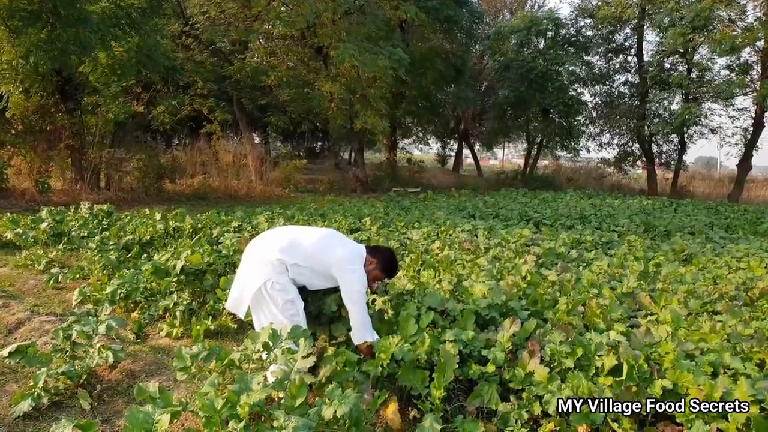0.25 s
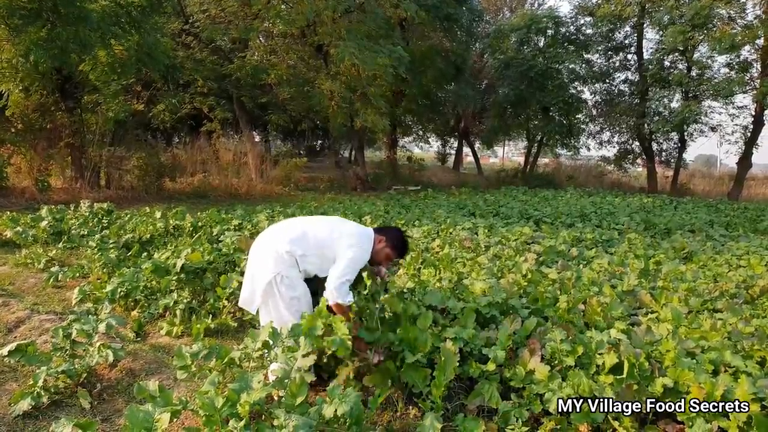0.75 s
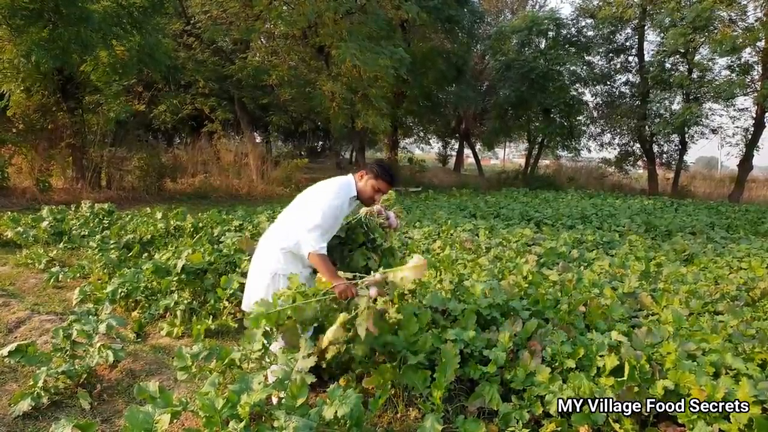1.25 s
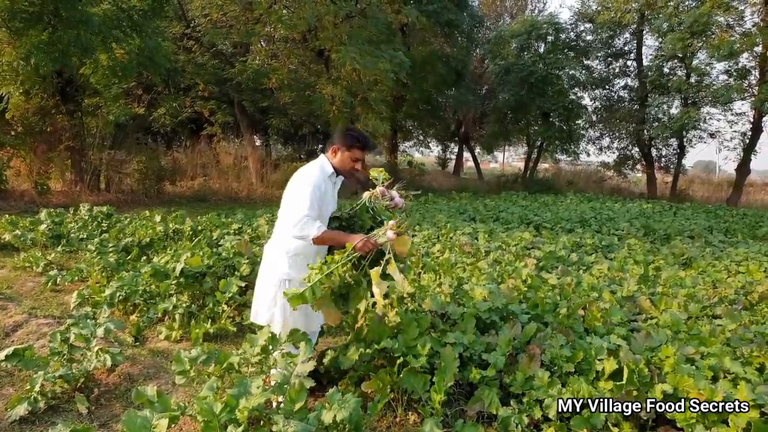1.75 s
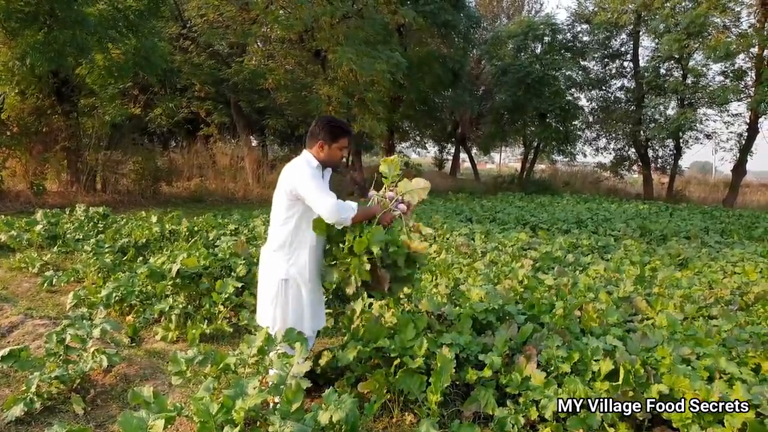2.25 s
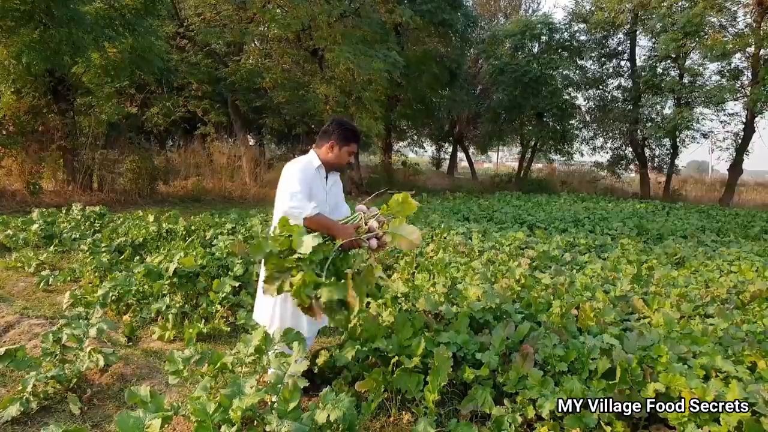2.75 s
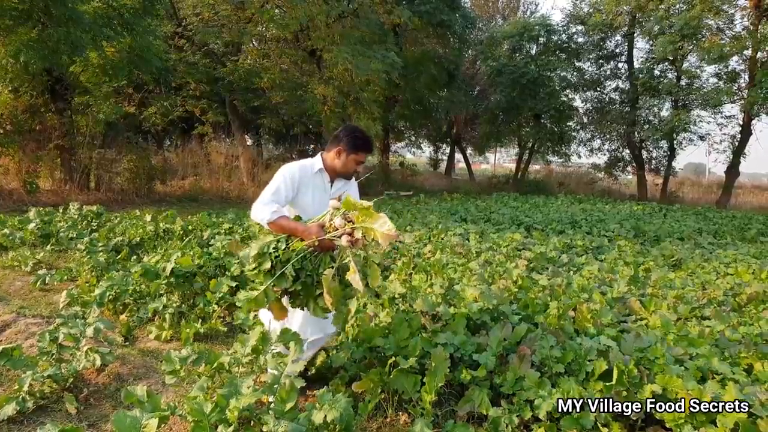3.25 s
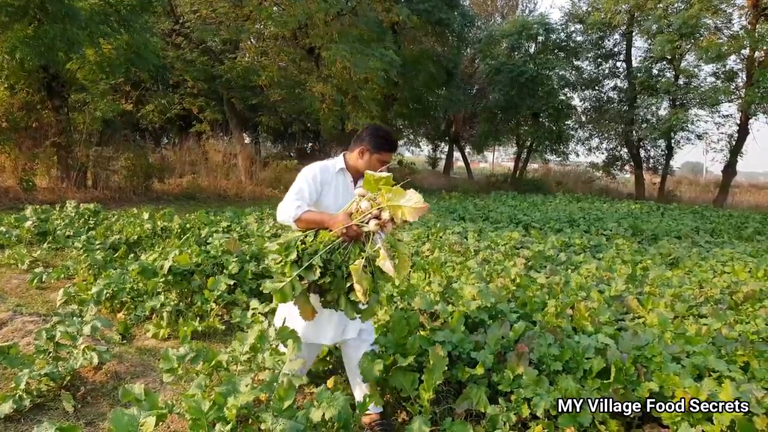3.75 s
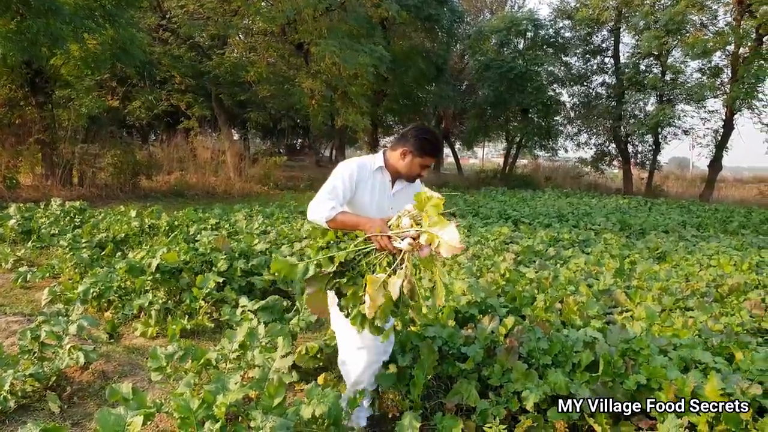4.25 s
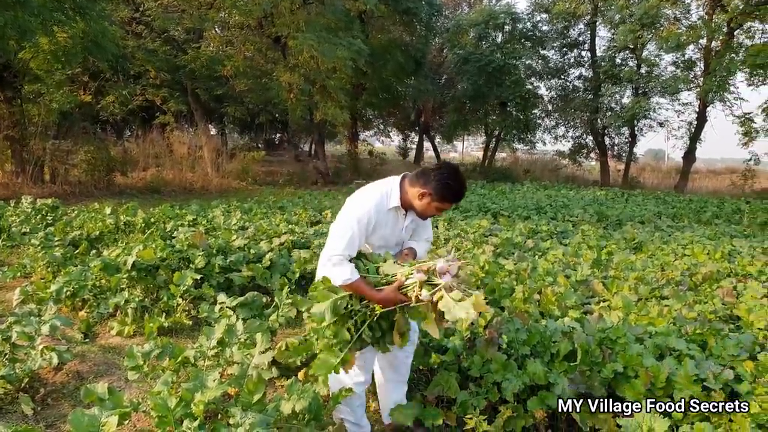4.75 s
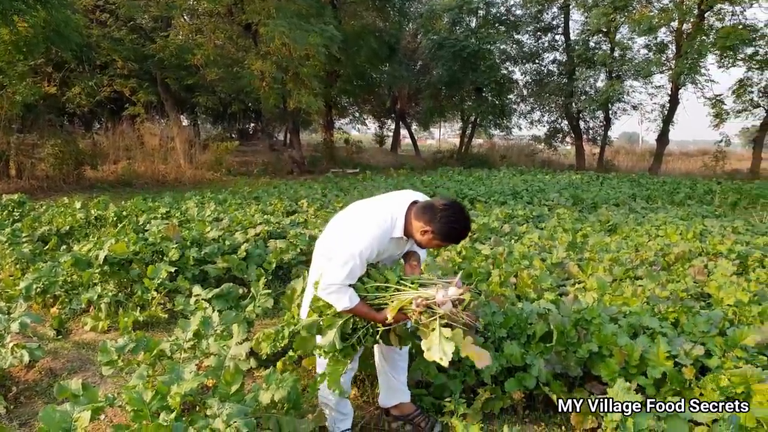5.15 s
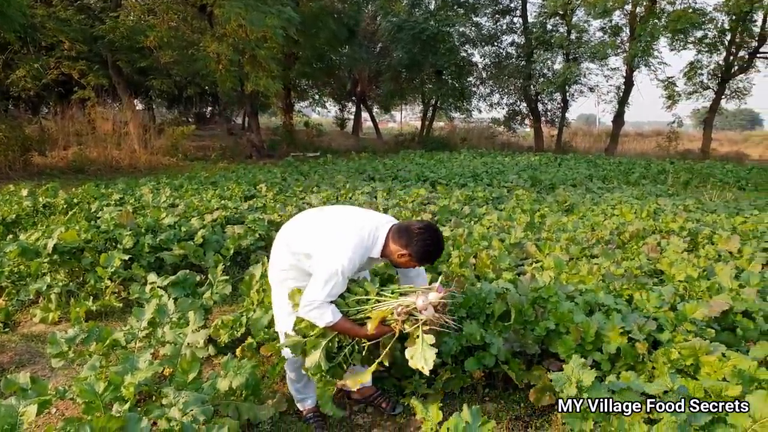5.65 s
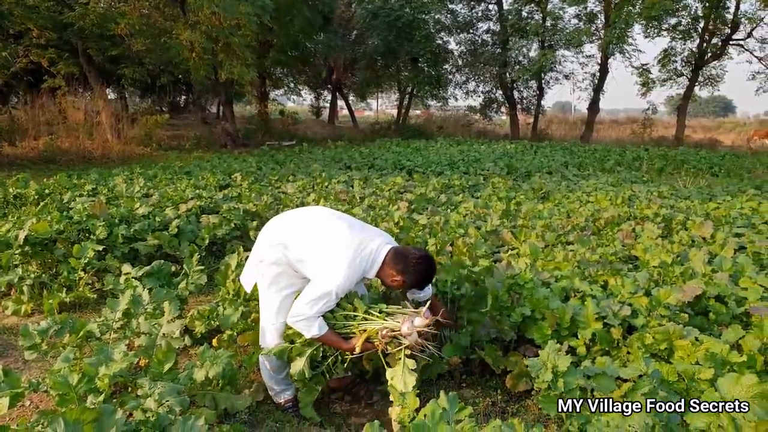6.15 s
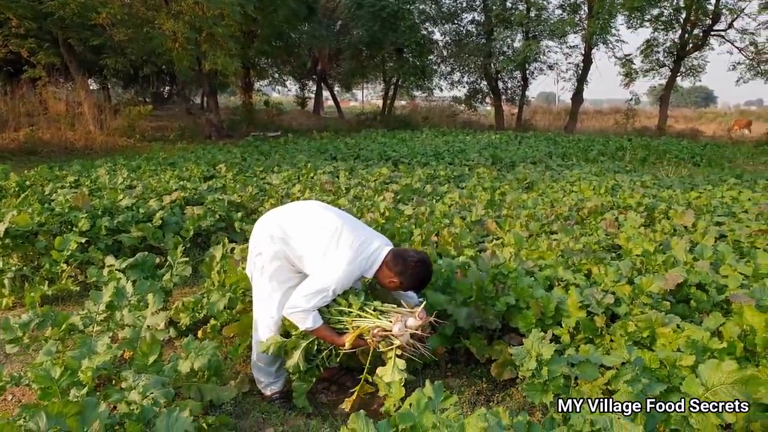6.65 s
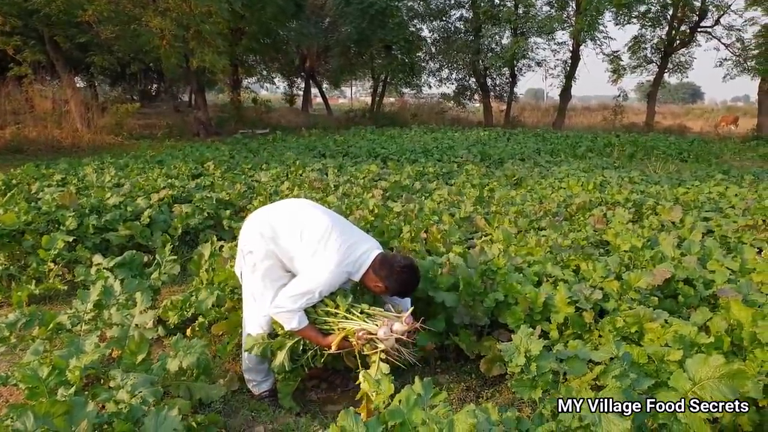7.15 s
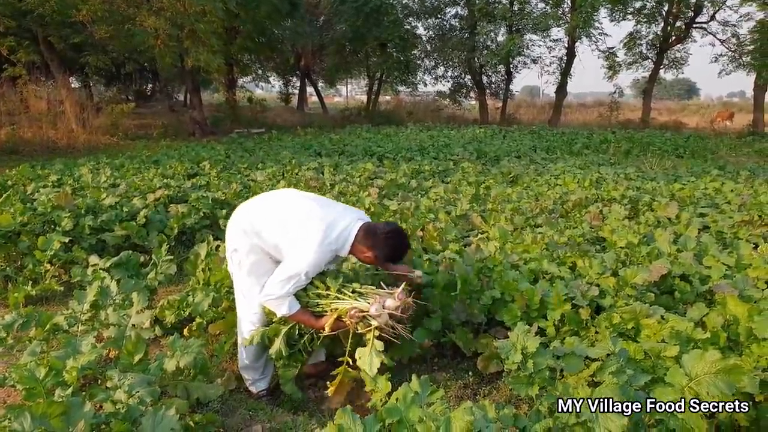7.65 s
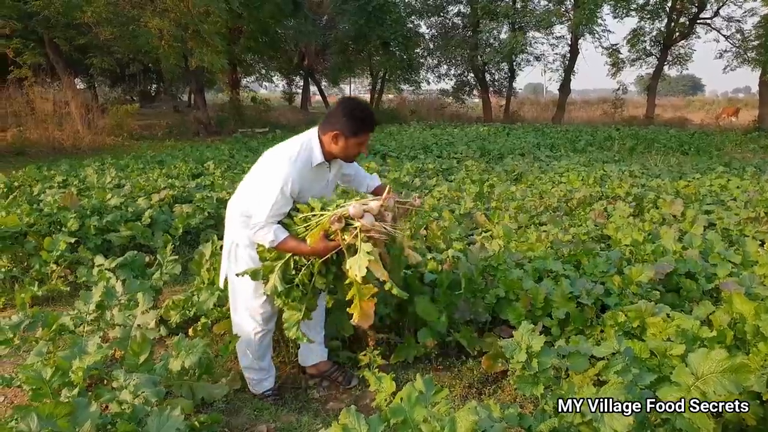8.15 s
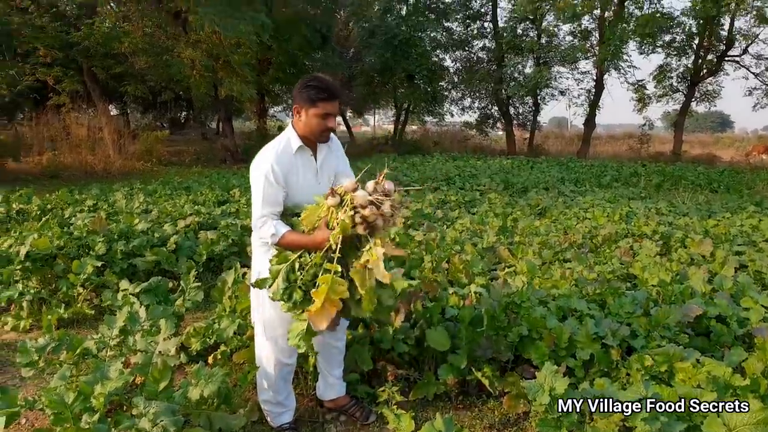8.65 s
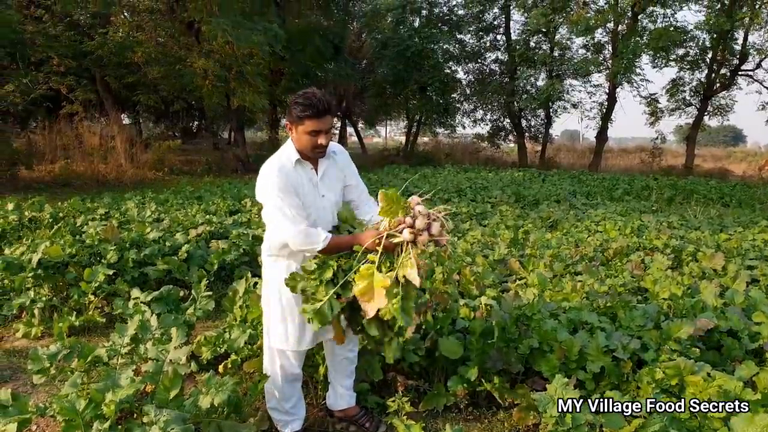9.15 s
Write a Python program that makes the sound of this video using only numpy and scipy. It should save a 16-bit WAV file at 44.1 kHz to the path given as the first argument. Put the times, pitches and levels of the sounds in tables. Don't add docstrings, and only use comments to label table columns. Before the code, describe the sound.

Leafy root plants are pulled and bundled with rustling, snapping stalks and dull root knocks, over a distant tractor, pump drone and one bird phrase.

```python
import sys
import numpy as np
from scipy import signal
from scipy.fft import rfft, irfft, next_fast_len
from scipy.io import wavfile
from scipy.ndimage import uniform_filter1d

SR = 44100
rng = np.random.default_rng(int(sys.argv[2]) if len(sys.argv) > 2 else 0)


def pcm_store(signal):
    levels = np.round(np.clip(np.atleast_2d(signal), -1, 1) * 32767)
    wavfile.write(sys.argv[1], SR, levels.astype(np.int16).T)


def volts(x):
    e = np.asarray(x, float) / 20
    return 10 ** e


N = 414981
T = np.arange(N) / SR

# [f/Hz, level/dB per Hz]
FIELD_COLOUR = [(12, -46), (20, -9), (65, -8), (139, -9.5), (156, -9.5), (179, -26.5), (230, -26.5),
                (465, -37.5), (583, -39.5), (1470, -29.5), (3330, -38.5), (5070, -28), (8170, -47),
                (15000, -47), (16500, -56)]
# [f/Hz, likeness 0-1]
FIELD_LIKENESS = [(60, 1), (150, 0.88), (380, 0.78), (950, 0.0072), (2380, 0.031), (5980, 0.053),
                  (15000, 0.044)]
# [f/Hz, level/dB]
MIC_TILT = [(60, 0.5), (120, 1.5), (240, -1), (480, 1), (950, 1), (1890, -1), (3770, -4), (7520, -0.5),
            (15000, 7)]

# [t/s, level/dB]
PUMP_LEVEL = [(0.0, -37), (0.018, -35), (0.71, -41), (1.13, -36), (1.36, -41), (2.8, -41.5), (3.77, -49),
              (3.9, -43), (4.43, -59), (4.48, -45), (5.16, -43.5), (6.32, -51), (6.65, -42), (7.0, -49),
              (9.3, -43), (9.41, -49.5)]
# [multiple of the pump pitch, level/dB]
PUMP_PARTIALS = [(1.2, -17), (.8, -14.5)]

# [t/s, level/dB]
TRACTOR_LOAD = [(0, -42.5), (.7, -40.5), (1.35, -40.5), (2.07, -45.5), (2.46, -60), (2.62, -46),
                (2.92, -45), (3.45, -44), (3.7, -71), (4, -51), (4.27, -49.5), (5.05, -47), (5.9, -57.5),
                (7.0, -52.5), (7.45, -78), (7.92, -69), (8.3, -101), (9.41, -91)]
# [t/s, firings per s]
FIRING_RATE = [(0, 45.1), (.6, 44.6), (1, 43.4), (2.07, 43.6), (2.5, 37.6), (2.62, 38.5), (3.5, 37.7),
               (4, 35.1), (4.27, 34.9), (5.05, 39.3), (5.3, 41.9), (5.9, 47), (7.07, 45), (7.7, 39),
               (9.41, 39)]
# [f/Hz, width/Hz, level/dB]
ENGINE_BLOCK = [(72, 30, 4), (330, 250, -11), (820, 200, -17), (1670, 180, -12), (2190, 170, 0),
                (2400, 170, -9), (2620, 170, -5)]
CYLINDER_LEVELS = [0, -4, -1.5]
# [t/s, peak level/dB]
HARD_FIRINGS = [(0.092, -30), (0.115, -36), (0.2239, -36), (0.2476, -32), (0.2693, -30), (0.3358, -28.5),
                (0.379, -27), (0.4702, -28), (0.515, -27), (0.6025, -30), (0.6699, -29), (0.7831, -28.5),
                (0.8054, -32), (0.9203, -31.5), (1.0134, -26), (1.0575, -30), (1.0824, -29), (1.1744, -31),
                (1.2426, -31), (1.265, -29), (1.3114, -33), (1.3352, -26.5), (1.3585, -32), (1.4025, -29),
                (1.474, -30.5), (1.5423, -31), (1.6332, -31), (1.6814, -29.5), (1.704, -29.5),
                (1.7725, -29.5), (1.8186, -32.5), (1.9106, -30), (1.957, -31.5), (1.9794, -30),
                (2.026, -31), (2.094, -32), (2.6922, -33), (2.7172, -32), (2.8504, -33), (2.877, -29.5),
                (2.928, -31.5), (3.035, -34), (3.166, -35.5), (3.2725, -33.5), (3.327, -32), (3.352, -33),
                (3.4042, -35), (3.4315, -30.5), (3.483, -36), (3.59, -35.5), (3.9225, -41), (3.952, -39),
                (3.979, -37), (4.008, -40), (4.0362, -35.5), (4.1804, -36), (4.323, -35), (4.4942, -33),
                (4.5755, -31), (5.05, -32)]
# [t/s, f/Hz, level/dB]
GEAR_WHINE = [
    (2.5, 772, -80),
    (2.56, 850, -69),
    (2.9, 1095, -70),
    (3.0, 1105, -63),
    (3.4, 1110, -64),
    (3.5, 1112, -72),
    (3.68, 1118, -67),
    (3.85, 1120, -72),
]

# [t/s, length/s, f/Hz, peak level/dB]
HELD_NOTES = [(4.831, 0.039, 3280, -35.5), (5.756, 0.041, 3560, -32), (5.791, 0.011, 3465, -22.5),
              (5.806, 0.013, 3310, -19), (5.834, 0.053, 2418, -26.5), (5.892, 0.0085, 2264, -24),
              (6.101, 0.023, 2896, -26), (6.129, 0.024, 2895, -24), (6.162, 0.024, 2870, -22.5),
              (6.176, 0.028, 2785, -24), (6.201, 0.014, 2830, -39), (6.277, 0.04, 3387, -23.5),
              (6.299, 0.032, 3345, -24), (6.359, 0.039, 2502, -22), (6.385, 0.04, 2430, -27),
              (6.693, 0.0063, 3260, -27), (6.709, 0.013, 2780, -27.5), (6.749, 0.019, 2126, -29.5),
              (6.764, .032, 2086, -33), (6.839, 0.023, 2050, -38), (6.725, 0.03, 5500, -47),
              (6.959, .01, 3900, -34), (6.92, 0.012, 3850, -20), (6.942, 0.0072, 3270, -25)]
# [t/s, length/s, start f/Hz, end f/Hz, peak level/dB]
WARBLE_NOTES = [(5.529, .018, 2840, 4250, -50), (5.559, 0.012, 4200, 4000, -35),
                (5.564, .011, 4050, 3280, -36), (5.573, .006, 3400, 4300, -38),
                (5.575, 0.0072, 2250, 2500, -37), (5.58, .006, 2800, 3700, -37),
                (5.584, 0.015, 2400, 2150, -37), (5.589, .015, 4700, 3200, -34),
                (5.600, 0.0069, 3400, 4400, -42), (5.602, 0.0075, 2100, 3220, -34),
                (5.609, .009, 3200, 2270, -34), (5.615, 0.0064, 2330, 2110, -29),
                (5.616, 0.012, 4600, 3270, -33), (5.621, 0.011, 3340, 3300, -34),
                (5.628, 0.0073, 2270, 3100, -38), (5.634, 0.0078, 3240, 2250, -31),
                (5.641, 0.012, 4440, 2650, -32.5), (5.642, .008, 2610, 2800, -43),
                (5.656, .008, 2920, 2500, -45), (5.661, 0.0158, 2800, 1830, -40),
                (6.643, .016, 3410, 3100, -41), (6.657, 0.011, 2770, 2750, -38),
                (6.656, .008, 4100, 4080, -37), (6.664, 0.017, 4080, 2270, -32.5),
                (6.677, .007, 3350, 3100, -32), (6.687, 0.0065, 4200, 3480, -33),
                (6.702, 0.013, 3260, 2130, -33), (6.703, .005, 4300, 3900, -36),
                (6.72, 0.0096, 2770, 2130, -33), (6.73, 0.0088, 2890, 2230, -29),
                (6.732, .015, 2300, 2160, -29), (6.734, 0.0062, 3070, 2800, -37),
                (6.881, 0.013, 3500, 3730, -30), (6.906, 0.0117, 6160, 4860, -20.5),
                (6.952, .009, 2780, 2130, -26)]
# [t/s, start f/Hz, peak level/dB]
SLUR_NOTES = [(5, 2410, -40), (5.822, 3030, -25), (6.092, 4320, -35), (6.328, 3410, -23),
              (6.345, 3030, -23.5), (6.686, 5700, -36), (6.711, 5750, -37), (6.656, 6150, -43),
              (6.668, 6300, -42), (6.862, 5900, -42), (6.930, 3740, -21)]
STROKE_NOTES = [
    (6.855, 3560, -32),
    (6.857, 2920, -33),
]
RISING_NOTES = [
    (6.066, 2300, -29),
    (6.076, 2490, -27),
]
FLICK_NOTES = [
    (5.800, 5430, -27),
    (5.818, 4700, -30),
    (6.327, 5050, -23.5),
    (6.344, 4400, -29),
]
# [start t/s, end t/s, period/s, start f/Hz, peak level/dB]
RUNS_OF_SLURS = [
    (6.087, 6.16, .0305, 2480, -32.5),
]
RUNS_OF_PIPS = [
    (6.969, 7.02, .0139, 2600, -29),
    (6.9755, 7.02, 0.013, 2465, -27),
    (7.022, 7.036, .0055, 2170, -32),
    (7.041, 7.05, 0.0052, 2040, -34),
    (5.903, 5.922, 0.0065, 2410, -33),
    (5.905, 5.94, .0066, 1910, -33),
    (6.428, 6.45, .006, 2460, -34),
    (6.437, 6.475, .0066, 1900, -33.5),
]

# [t/s, peak level/dB, f/Hz]
ROOT_KNOCKS = [(0.168, -35, 261), (0.222, -53, 320), (0.277, -42, 261), (0.367, -45, 269),
               (0.441, -47, 315), (0.561, -37, 294), (0.837, -48, 298), (0.904, -43, 275),
               (1.102, -51, 310), (1.243, -43, 269), (1.523, -52, 347), (1.916, -54, 299),
               (2.016, -53, 261), (3.944, -47, 331), (4.398, -48, 261), (4.782, -41, 285),
               (7.139, -53, 700), (7.199, -47, 261), (7.294, -54, 261), (7.397, -45, 345),
               (8.608, -48, 315), (8.656, -39, 323), (8.882, -44, 264), (9.338, -42, 646)]

# [f/Hz, level/dB per Hz]
LEAF_COLOUR = [(150, -71), (250, -7), (343, -2.5), (531, -20.5), (753, -2), (1230, -9), (1490, -3),
               (2120, -1), (2800, -6), (4340, -0.5), (6600, -5), (8140, -13), (14000, -10), (15700, -22),
               (16400, -50)]
LEAF_LIKENESS = (.6, .2, .03)
# [peak t/s, length/s, effort level/dB, fizz level/dB over swish]
HAND_MOVES = [(0.0, 0.38, -44.5, -5.5), (0.33, .2, -46.5, -6.5), (0.683, 0.53, -39, -6.5),
              (1.065, 0.43, -43, -6.5), (1.537, 0.1, -47, -9), (2.0, 1, -54, -10), (2.226, 0.29, -47, -5),
              (2.76, 0.43, -47.5, -6), (3.18, 0.26, -52, -7), (5.12, 0.2, -50, -13), (8.12, 0.18, -59, -26),
              (3.768, 0.15, -49.5, -3.5), (4.123, 0.21, -46.5, -3.5), (4.354, 0.18, -43, -6.5),
              (4.57, 0.21, -45.5, -6.5), (4.88, 0.31, -40.5, -7.5), (5.5, 0.33, -49, -11),
              (5.974, 0.33, -48.5, -8), (6.3, 0.8, -49.5, -8.5), (6.9, 0.044, -35.5, -4),
              (7.042, 0.22, -41, -6), (7.198, 0.16, -43, -3), (7.484, 0.28, -45, -3),
              (7.868, 0.36, -41.5, -6), (8.66, 0.19, -44, -3), (8.776, 0.056, -44.5, -4),
              (8.994, 0.29, -44.5, -6), (9.314, 0.54, -50, -3.5)]
# [peak t/s, length/s, body level/dB]
BUNDLE_SHIFTS = [
    (.05, 0.32, -49.5),
    (2.25, .2, -61),
    (4.85, 0.19, -46),
    (8.67, 0.067, -54.5),
    (9.1, 0.44, -59),
    (9.36, 0.13, -63),
]
# [t/s, swish peak level/dB, fizz level/dB over swish, body level/dB over swish]
STALK_SNAPS = [(0.1695, -15.5, -5.5, -13), (0.2994, -31, -4, -20), (0.366, -29, -21, -7),
               (0.5188, -29, -8, -1), (0.8324, -27, 7, -3), (1.4226, -29.5, -19, -20.5),
               (2.06, -38, -2, -11), (4.8012, -21.5, -7, -0.5), (4.8148, -27, -12, 1),
               (4.8314, -29, -18, 5), (4.9184, -35, -15, 2), (5.004, -24.5, -10, -6.5),
               (6.1215, -29, -7, -20), (6.8757, -18.5, -10, -10.5), (7.0074, -28.5, -7, -16),
               (7.0413, -32, -24, -20), (7.144, -28, -3, -3.5), (7.2, -21.5, -4, -9),
               (7.233, -31, -10, -25), (7.255, -28.5, -9, -18), (7.219, -28, -16, -29),
               (7.2937, -33.5, -21, 0), (7.3967, -22.5, -16, -7), (7.411, -27, -9, -12),
               (8.6228, -32, 3, -4), (8.673, -30, -2, -5), (8.8955, -36, -5, 1), (8.9501, -33, 2.5, -2),
               (8.9574, -33, 1, -11), (8.982, -29.5, 0, -4), (9.2718, -32, -4, -25),
               (9.3398, -25.5, 3.5, -15), (9.148, -38, -2, -20), (9.245, -44, 0, -20), (9.318, -41, 1, -20)]
LEAF_CRUNCHES = [(0.4539, -32, 2, 0), (0.562, -30, 2, -22), (0.9044, -31.5, -15, -16), (0.988, -25, 0, -9),
                 (1.0234, -46, 15, -9), (1.1144, -27.5, -5, -4), (1.2444, -35.5, 3, 1),
                 (1.5274, -37.5, -4, 2), (2.2194, -31.5, 0, 1.5), (3.7134, -44, -5, 2),
                 (4.3594, -35, 1, -13), (5.1841, -45, 6, -12), (7.0773, -26, -18, -26),
                 (7.5433, -33, 2, -27), (7.9972, -35, 1, -7)]
# [t/s, f/Hz, peak level/dB]
STALK_RINGS = [(0.108, 850, -40), (0.132, 850, -42), (0.149, 850, -40), (0.1697, 5220, -13),
               (0.1705, 6470, -12.5), (0.453, 820, -37), (0.518, 850, -34), (4.8013, 895, -21.5),
               (4.8019, 1400, -32), (4.8013, 2280, -20.5), (4.8006, 5740, -22), (4.815, 2100, -32),
               (4.815, 850, -34), (4.8315, 2230, -26), (4.8317, 860, -33), (4.832, 1330, -37),
               (5.004, 3480, -22), (5.004, 6800, -19), (6.8753, 4970, -23), (6.876, 2920, -24),
               (6.877, 1510, -28.5), (6.877, 920, -44), (6.901, 800, -44), (7.145, 810, -33),
               (7.1996, 3800, -20), (7.3966, 4530, -21), (7.3965, 1020, -39), (8.626, 955, -33),
               (8.626, 1510, -36), (8.659, 765, -37), (8.677, 790, -34.5), (8.675, 1520, -35),
               (8.896, 1570, -24.5), (8.896, 1210, -31), (8.896, 2280, -28.5), (8.896, 960, -34),
               (9.340, 5550, -18.5), (9.346, 4750, -21), (9.341, 794, -31.5)]


def evened(x):
    return x / np.sqrt(np.mean(x ** 2, axis=-1, keepdims=True) + 1e-20)


def read(points, hz):
    f, value = np.transpose(points)
    return np.interp(np.log(hz + 1), np.log(f + 1), value)


def follow(rows):
    s, *columns = np.transpose(rows)
    return [np.interp(T, s, c) for c in columns]


def drift(hz):
    step = 64
    coarse = signal.lfilter(*signal.butter(2, hz * step * 2 / SR), rng.standard_normal(N // step + 2))
    return np.interp(np.arange(N) / step, np.arange(len(coarse)), evened(coarse))


def wave(turns):
    return np.sin(2 * np.pi * turns)


def resonate(x, hz, width):
    return signal.lfilter(*signal.iirpeak(hz, hz / width, SR), x)


def placed(x, lead, pan_db):
    return np.array([x * volts(pan_db / 2), np.roll(x, lead) * volts(-pan_db / 2)])


def paired(noise, same):
    same = np.clip(same, 0, 1)
    return np.sqrt(1 - same) * noise[:2] + np.sqrt(same) * noise[2]


def field():
    frames, hz = N // 512 + 5, np.fft.rfftfreq(2048, 1 / SR)
    a, b, c, d, patches = rng.standard_normal((frames, 1025, 5)).T
    patches = uniform_filter1d(patches, size=20, axis=0)
    patches = evened(uniform_filter1d(patches, size=8, axis=1))
    same = np.clip(read(FIELD_LIKENESS, hz), -1, 1)[:, None]
    left = a + 1j * b
    right = same * left + np.sqrt(1 - same ** 2) * (c + 1j * d)
    spectra = np.array([left, right]) * volts(read(FIELD_COLOUR, hz)[:, None] + 2 * patches)
    sound = signal.istft(spectra, nperseg=2048, noverlap=1536)[1][:, :N]
    return volts(-44) * sound / np.std(sound)


def insects():
    hz, width, level_db = 6280, 730, -55.5
    hiss = rng.standard_normal((2, N))
    hiss = resonate(resonate(hiss, hz, width), hz, width)
    return volts(level_db + drift(1.5)) * evened(hiss)


def pump():
    pump_hz, rise_hz_per_s = 170.1, .4
    turns = (pump_hz + rise_hz_per_s * T / 2) * T + .12 * drift(1.5)
    sides = sum(volts(db + 4.3 * drift(37.0)) * np.sin(2 * np.pi * k * turns + 0.8 * drift(5.0))
                for k, db in PUMP_PARTIALS)
    tone = volts(2.04 * drift(8.2)) * np.sin(2 * np.pi * turns + 0.31 * drift(4.2))
    return placed(volts(follow(PUMP_LEVEL)[0] + 3) * (tone + sides), 1, .1)


def exhaust(turns, load_db):
    level_db = -44.5 + 0.19 * (load_db + 50)
    orders = ((1, -11.0), (2, -0.5), (3, -5.0))
    return sum(volts(level_db + db + 2.0 + 2.0 * drift(4.9))
               * np.sin(2 * np.pi * k * turns + 0.36 * drift(18.0)) for k, db in orders)


def engine_knock(turns, hz, load_db):
    behind_trees_s, knock_s, hard_over_load_db = 4.7, .004, 11.5
    firing = turns.astype(int)
    uneven_db = 1.5 * rng.standard_normal(1000)[firing]
    strength = volts(np.take(CYLINDER_LEVELS, firing % len(CYLINDER_LEVELS)) + uneven_db)
    s, hard_db = np.transpose(HARD_FIRINGS)
    at, hard = (s * SR).astype(int), np.zeros(N)
    hard[at] = volts(hard_db - load_db[at] - hard_over_load_db)
    ordinary = ~np.isin(firing, np.round(turns[at]))
    blur = .15 * volts(np.clip(-48 - load_db, 0, 12) + 6 * (T > behind_trees_s))
    ordinary_decay = np.exp(-(turns % 1) / hz / knock_s)
    hard_decay = signal.lfilter([1], [1, -np.exp(-1 / (knock_s * SR))], hard)
    rattle = strength * (ordinary * .6 * ordinary_decay + blur) + .35 * hard_decay
    clicks = 8 * strength * ordinary * np.diff(firing, prepend=0) * (T < behind_trees_s)
    blows = rattle * rng.standard_normal(N) + 13 * hard + clicks
    knock = sum(volts(db) * evened(resonate(resonate(blows, f, w), f, 2 * w)) for f, w, db in ENGINE_BLOCK)
    return knock * volts(load_db)


def gear_whine():
    hz, level_db = follow(GEAR_WHINE)
    running = (T > GEAR_WHINE[0][0]) & (T < GEAR_WHINE[-1][0])
    loudness = running * volts(level_db + 1.5 + 2.5 * drift(25))
    return loudness * np.sin(2 * np.pi * np.cumsum(hz) / SR + 1.2 * drift(20))


def tractor():
    (hz,), (load_db,) = follow(FIRING_RATE), follow(TRACTOR_LOAD)
    turns = np.cumsum(hz) / SR
    return placed(exhaust(turns, load_db) + engine_knock(turns, hz, load_db) + gear_whine(), 3, 0.21)


def notes():
    def repeated(runs):
        return [(s, hz, db) for start, end, period, hz, db in runs for s in np.arange(start, end, period)]
    sung = (  # length/s, end over start pitch, where sung
        (.013, .9, SLUR_NOTES + repeated(RUNS_OF_SLURS)),
        (.016, .74, STROKE_NOTES),
        (.014, 1.15, RISING_NOTES),
        (.0065, .84, repeated(RUNS_OF_PIPS)),
        (.007, .67, FLICK_NOTES))
    glides = [(s, length, hz, hz * ratio, db) for length, ratio, rows in sung for s, hz, db in rows]
    sag_hz_per_s = 1300
    holds = [(s, length, hz, hz - sag_hz_per_s * length, db) for s, length, hz, db in HELD_NOTES]
    return glides + WARBLE_NOTES + holds


def bird():
    song, wobble = np.zeros(N), np.array([drift(65), drift(170)])
    for s, length, start_hz, end_hz, db in notes():
        u, at = np.linspace(0, 1, round(length * SR)), round(s * SR)
        hoarse = np.clip(abs(end_hz - start_hz) / length / 90000 + volts(-db - 46), .06, .8)
        pitch, loud = wobble[:, at:at + len(u)] * hoarse
        hz = (start_hz + (end_hz - start_hz) * u) * (1 + .03 * pitch)
        turns = np.cumsum(hz) / SR
        octave_db = -16 - 2.8 * ((start_hz + end_hz - 5900) / 900) ** 2
        tone = wave(turns) + volts(octave_db) * wave(2 * turns)
        tone = tone + volts(-29.5) * wave(3 * turns) + volts(-34.0) * wave(4 * turns)
        song[at:at + len(u)] += volts(db + .8 + 3.5 * loud) * np.sin(np.pi * u) ** .6 * tone
    t = np.arange(SR // 2) / SR
    near, far = volts(-60 * t / .05), volts(-5 - 60 * t / .5)
    sparse = rng.random((2, len(t))) < .2
    trees = rng.standard_normal((2, len(t))) * sparse * (near + far) * (t > .003)
    echo = signal.fftconvolve(song[None], trees / np.linalg.norm(trees[0]), axes=1)[:, :N]
    return placed(song, 14, 4.5) + volts(-9) * echo


def thuds():
    out, t = np.zeros(N + 2000), np.arange(2000) / SR
    decay = np.exp(-t / 0.0062)
    for s, db, hz in ROOT_KNOCKS:
        at = round(s * SR)
        out[at:at + len(t)] += volts(db + 2) * np.minimum(t * hz, 1) * decay * wave(hz * t)
    return placed(out[:N], 3, 0.1)


def leaf_bands():
    hz = abs(np.fft.fftfreq(2048, 1 / SR))
    low, high = (1 / (1 + (hz / edge) ** 12) for edge in (2700, 7300))
    shares = np.sqrt([low, (1 - low) * high, 1 - high])
    gain = np.log(volts(read(LEAF_COLOUR, hz)) * shares + 1e-5)
    spectrum = np.exp(gain - 1j * signal.hilbert(gain).imag)
    taps = np.fft.ifft(spectrum).real[:, :1024]
    return taps / np.linalg.norm(taps, axis=1, keepdims=True)


def swells(rows, t):
    rise_share, ends_db = 0.49, -5.5
    s, length, db = np.transpose(rows)[:3, :, None]
    u = (t - s) / (length * np.where(t < s, rise_share, 1 - rise_share))
    return volts(2 * (db + ends_db * abs(u) ** 2.04))


def effort():
    rest_db, rest_fizz_db = -67, -18
    t = T[::64]
    power, fizz_db = swells(HAND_MOVES, t), np.transpose(HAND_MOVES)[3, :, None]
    swish_db = 10 * np.log10(power.sum(0) + volts(2 * rest_db))
    bright_db = 10 * np.log10((power * volts(2 * fizz_db)).sum(0) + volts(2 * (rest_db + rest_fizz_db)))
    along_db = -53.5 + 0.68 * (swish_db + 47)
    body_db = 10 * np.log10(volts(2 * along_db) + swells(BUNDLE_SHIFTS, t).sum(0))
    return [np.interp(T, t, c) for c in (bright_db, swish_db, body_db)]


def rustle(bands):
    fizz_db, swish_db, body_db = effort()
    creases_per_s, crease_s = 350, 0.0051
    crease_db = 3.5 * np.minimum(rng.exponential(1, N), 4) + 3.0 * drift(25)
    creases = (rng.random(N) < creases_per_s / SR) * volts(crease_db)
    ticks = signal.lfilter([1], [1, -np.exp(-1 / (crease_s * SR))], creases)
    rub = evened(rng.standard_normal((3, N)) * (1.7 + evened(ticks)) * volts(1.2 * drift(16)))
    levels = volts([body_db, swish_db, fizz_db])
    return sum(signal.oaconvolve(paired(rub, same) * level, band[None])[:, :N]
               for level, band, same in zip(levels, bands, LEAF_LIKENESS))


def bursts(events, shape, bands):
    out = np.zeros((2, N + 4000))
    noises = rng.standard_normal((len(events), 3, len(shape)))
    for (s, db, fizz_db, body_db), noise in zip(events, noises):
        at = round(s * SR)
        for level, band, same in zip(volts([body_db, 0, fizz_db]), bands, LEAF_LIKENESS):
            burst = paired(noise * shape, same + 0.58) * level * volts(db)
            out[:, at:at + len(shape) + 1023] += signal.fftconvolve(burst, band[None])
    return out[:, :N]


def rings():
    ring_s, rough_share = .003, .35
    out, t = np.zeros(N + 900), np.arange(900) / SR
    for (s, hz, db), noise in zip(STALK_RINGS, rng.standard_normal((len(STALK_RINGS), len(t)))):
        rough = 1 + rough_share * evened(uniform_filter1d(noise, size=round(40000 / hz)))
        envelope = np.minimum(t * hz, 1) * np.exp(-t / ring_s * np.sqrt(hz / 1000))
        at = round(s * SR)
        out[at:at + len(t)] += volts(db) * rough * envelope * wave(hz * t)
    return placed(out[:N], 1, 0.1)


def snaps(bands):
    t = np.arange(2600) / SR
    crack_shape = .35 * np.exp(-t / .0003) + .45 * np.exp(-t / .0011) + .22 * np.exp(-t / .006)
    crunch_shape = np.sqrt(t / 0.029) * np.exp(-t / 0.014)
    no_bass = signal.butter(4, 680, "high", fs=SR)
    cracks = signal.lfilter(*no_bass, bursts(STALK_SNAPS, crack_shape, bands))
    crunch = bursts(LEAF_CRUNCHES, crunch_shape, bands)
    pocket = volts(-1) * resonate(crunch, 4770, 1300)
    return cracks + rings() + 0.64 * crunch + pocket


def scene():
    bands = leaf_bands()
    background = field() + insects() + pump() + tractor() + bird()
    return background + thuds() + rustle(bands) + snaps(bands)


def roll_off(x):
    return signal.sosfilt(signal.butter(12, 16820, fs=SR, output="sos"), x)


def record(dry):
    low_hz, high_hz = 46, 15780
    size = next_fast_len(N)
    hz = np.fft.rfftfreq(size, 1 / SR)
    low_cut = 1 + (low_hz / (hz + 1)) ** 6
    high_cut = 1 + np.minimum(hz / high_hz, 1.02) ** 900
    band = 1 / np.sqrt(low_cut * high_cut)
    tilt = volts(read(MIC_TILT, hz) * np.array([[.5], [-.5]]))
    mix = irfft(rfft(dry, size) * band * tilt, size)[:, :N]
    return roll_off(mix)


dry = scene()
out = record(dry)
pcm_store(out)
```